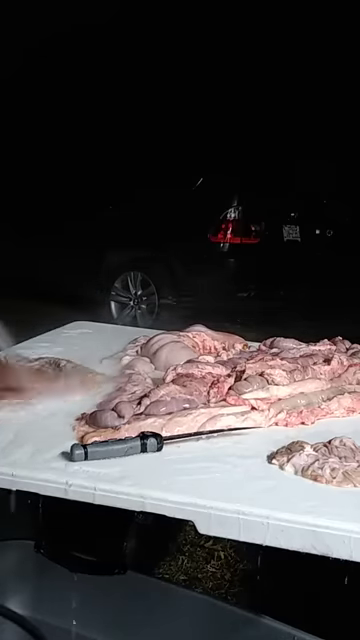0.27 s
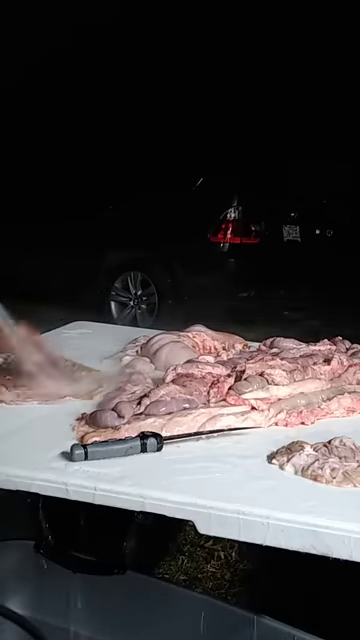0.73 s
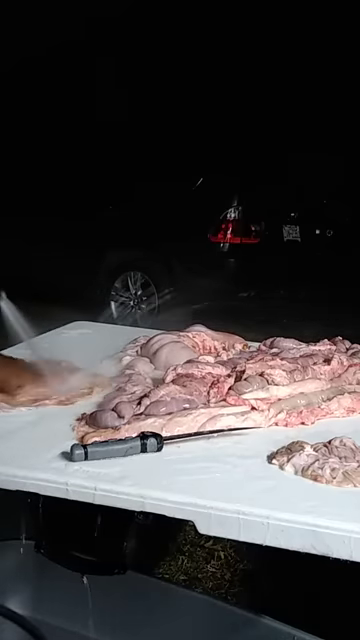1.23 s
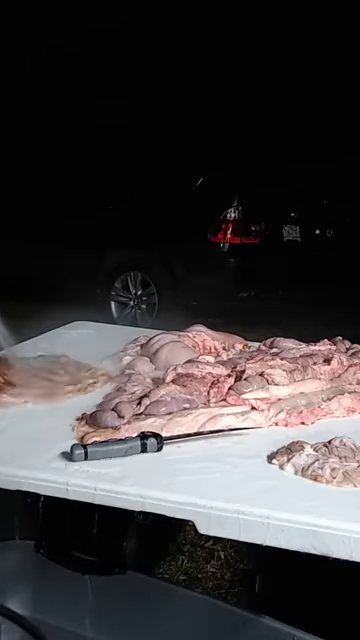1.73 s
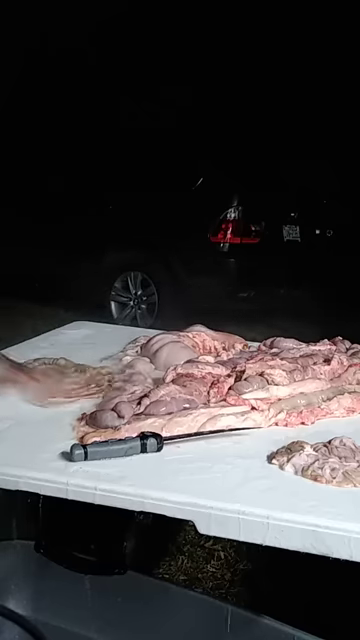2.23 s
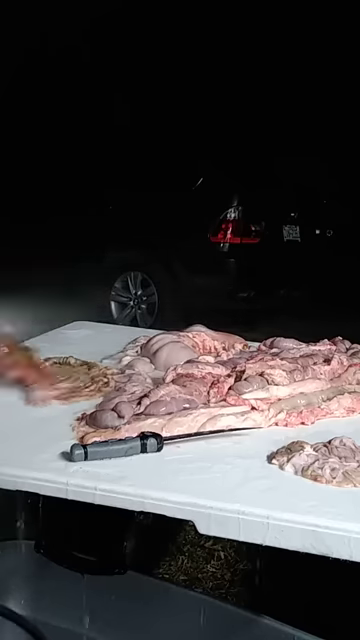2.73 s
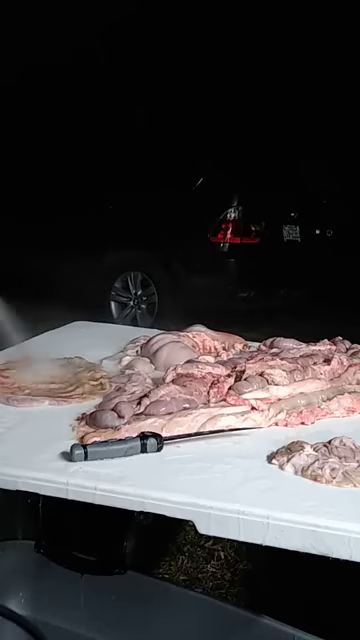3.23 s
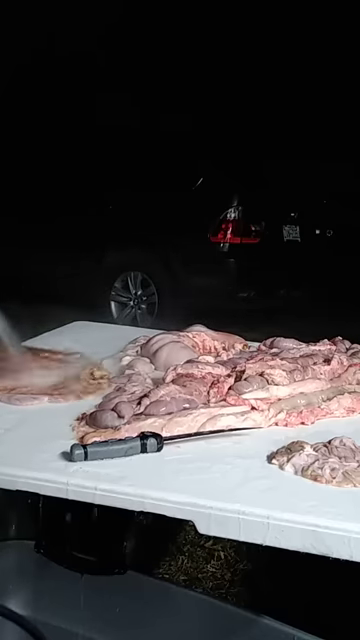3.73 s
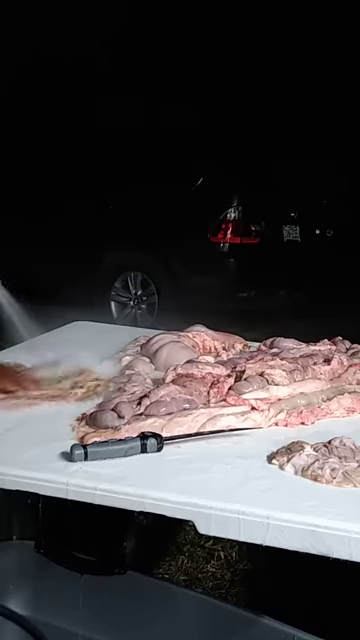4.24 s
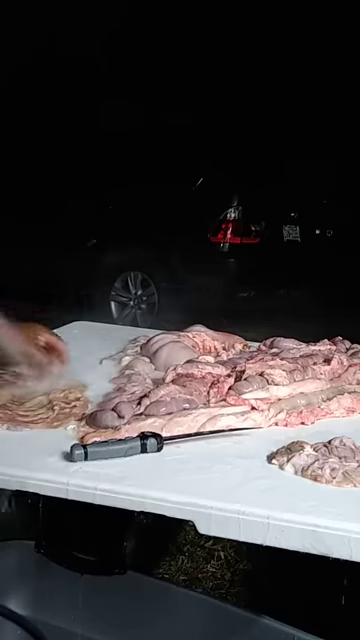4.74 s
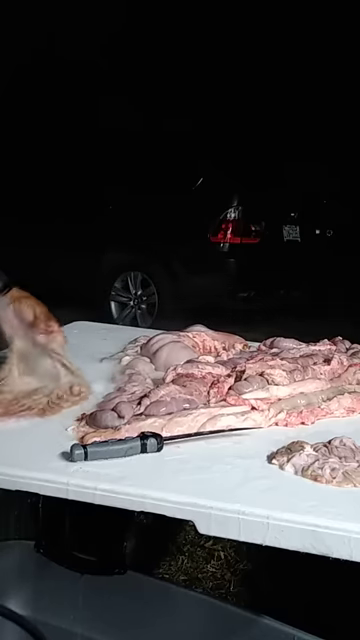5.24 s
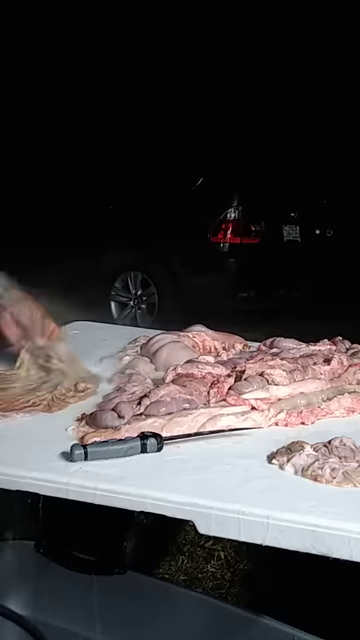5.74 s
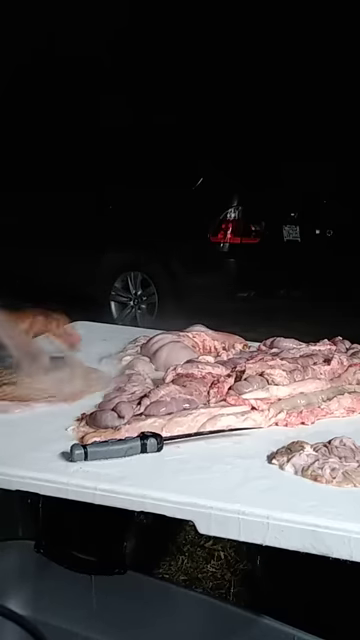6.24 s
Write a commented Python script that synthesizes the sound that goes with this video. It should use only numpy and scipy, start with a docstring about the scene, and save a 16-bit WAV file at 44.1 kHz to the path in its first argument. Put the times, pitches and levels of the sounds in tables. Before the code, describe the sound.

Close mono sound outdoors, dry, with no deep bass and a steeply cut top. A hose nozzle sprays raw meat on a plastic folding table from start to end, about 6.5 seconds. Dense drops, bubbles and fine hiss form a bright, coarse splash that swells and ebbs several times a second as a hand turns the meat. Hard jet contact adds a narrow, ringing rasp at about 0.2 s, briefly at 1.4 s, strongest from 2.4 to 2.9 s, and again at 5.1 s. Around 1.05 s a soft, heavy flop booms through the table; another, shorter thud comes near 2.87 s, followed by a tiny dip in the spray. Wet splats and squelches, some low near 1.3 s, others higher, are scattered throughout, clustering around 4.1 and 5.3 s. Beneath lie a faint hollow table drone and a weak, wavering low hum. The spray continues at the end.

```python
"""A hose nozzle sprays raw meat on a plastic folding table, outdoors at night, heard in mono.
From the start, random drop impacts, bubbles and hiss patter and splash as a hand turns the meat.
A hard jet excites narrow bands: it rasps at 0.2 and 1.4 s, for half a second from 2.4 s, and at 5.1 s.
Near 1.0 and 2.9 s the meat flops and excites the damped modes of the table, which booms.
Throughout, bursts of filtered noise make splats, the table drones and a faint low hum wavers."""
import sys
import numpy as np
from scipy import signal
from scipy.fft import rfft, irfft
from scipy.io import wavfile

SR = 44100
rng = np.random.default_rng(int(sys.argv[2]) if len(sys.argv) > 2 else 0)


def file_out(sig):
    """Save sig as 16-bit WAV at sys.argv[1]."""
    # one column per channel
    cols = np.atleast_2d(sig).T
    # limit, then scale
    lim = np.clip(cols, -1, 1)
    pcm = np.round(lim * 32767).astype(np.int16)
    wavfile.write(sys.argv[1], SR, pcm)


N = 285190
TIME = np.arange(N) / SR
FREQS = np.maximum(np.arange(N // 2 + 1) * SR / N, 1)

# borders between the five bands of the spray: edge_hz
ZONE_EDGES_HZ = [470, 900, 2400, 4400]
# relative spectral density of the spray: frequency_hz, density_db
SPRAY_COLOUR = [(190, -15), (350, -9.5), (600, -5), (950, -2.5), (2000, 1), (3200, -5.5), (5000, -5),
                (6200, -3.5), (6900, -10), (7600, -7), (8000, -19.5), (8300, -24.5)]
# resonances in series that colour every drop: frequency_hz, width_hz, gain_db
RESONANCES = [(268, 34, 9.3), (427, 59, 10.1), (560, 61, 8.9), (650, 63, 8.6), (739, 51, 8.3),
              (880, 22, 3.5), (1163, 50, 11.0), (1242, 75, 5.6), (1378, 34, 7.2), (1783, 40, 7),
              (1832, 52, 6.2), (1973, 18, 4.0), (2059, 61, 6.7), (2238, 45, 2.1), (2483, 37, 4.3),
              (2579, 69, 7.0), (2821, 83, 12.7), (3370, 90, 11), (3465, 60, 8.5), (3619, 36, 4.8),
              (3724, 61, 9.4), (4174, 109, 7.5), (4415, 55, 4.0), (4607, 50, 5.1), (4851, 93, 5.1),
              (5368, 158, 4.9), (6494, 82, 7.3), (6734, 43, 4.0), (7249, 168, 8.1), (7738, 95, 4.8)]
# the spray between passes, from large drops to fine: zone, level_db, flutter_db
ZONES = [("hollow patter", -58.5, 0.77), ("patter on the tabletop", -49.5, 0.99),
         ("splash on wet meat", -43, 0.63), ("spatter", -42, .8), ("fine mist", -43.5, 0.94)]
# the hand brings meat and stream together: start_s, length_s, patter_rise_db, splash_rise_db, mist_rise_db
PASSES = [(0.0, 0.028, 4, 9.5, 2), (0.113, 0.2, 5.5, 5.5, 5), (0.322, 0.19, 3.5, 4.5, 4),
          (.53, .08, 0.5, 0.5, 1), (0.61, 0.12, 5.5, 6.5, 4.5), (0.748, 0.28, 5.5, 5, 3),
          (1.042, 0.037, 13.5, 11, 5.5), (1.125, 0.12, 4.5, 3, 1.5), (1.292, .14, 8, 7.5, 6),
          (1.487, 0.082, 3.5, 4.5, 5.5), (1.558, 0.24, 10, 4.5, 3.5), (1.916, 0.096, 7, 10, 2.5),
          (2.043, 0.14, 7.5, 5, 4), (2.393, 0.36, 8.5, 7.5, 6), (2.761, 0.19, 7.3, 7.5, 1),
          (2.96, 0.34, 8.5, 3, 5), (3.32, 0.12, 4, 1, 3.5), (3.446, .19, 8, 8, 4),
          (3.652, 0.11, 6.5, 1.5, 2), (3.77, 0.26, 7, 7.5, 3.8), (4.042, 0.15, 8, 4.5, 2.5),
          (4.33, 0.18, 8, 6.5, 1.5), (4.527, 0.17, 7, 10.5, 1.5), (4.702, 0.37, 10, 5.5, 3),
          (5.058, 0.091, 10, 10.5, 7), (5.161, 0.28, 10, 8, 3.5), (5.43, 0.17, 5, 7.5, 3.5),
          (5.61, 0.25, 6, 7, 3), (5.984, 0.18, 4, 5, 4.5), (6.172, 0.31, 7, 3.5, 2.5)]
PASS_ATTACK_S, PASS_RELEASE_S = 0.045, 0.048
# spatter rises by these shares of the rises in dB
SPATTER_FOLLOWS_SPLASH, SPATTER_FOLLOWS_MIST = 0.49, 0.31
# rise of the hollow patter as the spray finds other parts of the tabletop: time_s, rise_db
HOLLOWNESS = [(0, 3.5), (.8, 6.5), (1.3, -1), (2.2, 0), (2.8, -6), (3.9, -3), (5.1, -0.5), (5.9, -3),
              (6.47, -0.5)]
# the whole spray dips briefly after the hardest strike
DIP_S, DIP_LENGTH_S, DIP_DB = 2.949, 0.02, -5

# the jet strikes hard: start_s, length_s, level_db
JET_STRIKES = [(0.242, .29, -40.5), (1.385, 0.048, -37), (2.41, .525, -31), (5.085, 0.068, -35)]
# what rings where the jet strikes, relative levels: frequency_hz, width_hz, level_db
JET_MODES = [(747, 25, 2.5), (1176, 20, 3), (2580, 80, -3), (3520, 270, -1), (3720, 36, 0), (4036, 61, 1.5),
             (4160, 91, -14)]
# it holds, weakens as it slides off its spot, and is gone
JET_ATTACK_S, JET_HOLD_S, JET_FADE_DB_PER_S, JET_RELEASE_S = 0.061, 0.19, 30, 0.03

# the most distinct splats and squelches: time_s, level_db, centre_hz, width_hz
SPLATS = [(.13, -34, 3600, 600), (.198, -33, 1690, 250), (.523, -33.5, 3640, 500), (.844, -34, 3320, 600),
          (1.06, -30.5, 1750, 704), (1.32, -31, 610, 130), (1.94, -33, 2900, 1500),
          (1.985, -35.5, 4800, 2000), (2.233, -34.5, 3900, 900), (2.811, -31, 1800, 895),
          (2.918, -33.5, 2300, 2200), (4.003, -35.5, 3100, 2500), (4.088, -33.5, 1840, 300),
          (4.165, -33.5, 4200, 2500), (4.558, -32, 1760, 700), (4.68, -35, 665, 200),
          (5.24, -46.5, 280, 80), (5.28, -33.5, 1280, 350), (5.339, -34.5, 3870, 500),
          (5.38, -35, 2030, 300), (5.545, -32, 2020, 500), (5.825, -36, 2700, 1200),
          (6.364, -33, 1810, 250)]
# length at 1 kHz, and the power of pitch by which higher gouts are briefer
SPLAT_LENGTH_S, SPLAT_SHORTENS = 0.023, 0.19
# faint, high spits at random moments
SPITS_PER_S, SPIT_DB, SPIT_SPREAD_DB = 2.0, -43, 1
SPIT_LOW_HZ, SPIT_HIGH_HZ, SPIT_WIDTH_HZ = 4200, 7040, 900

# meat flopping on the table: time_s, level_db, contact_s
FLOPS = [(1.046, -34, 0.0082), (1.073, -42, 0.012), (2.859, -48, .004), (2.868, -36.5, 0.0018),
         (2.887, -40, .004)]
# low damped modes of the table, relative levels: frequency_hz, level_db, t60_s
TABLE_MODES = [(62, -13.5, .3), (95, 1, 0.13), (118, -1, 0.092), (148, -2, 0.26), (214, -7.5, 0.16),
               (256, -2.5, 0.19)]
# relative spectral density of the table's drone: frequency_hz, density_db
DRONE_COLOUR = [(25, -40.5), (40, -22.5), (58, -8), (95, -5), (117, -0.5), (135, -9), (153, -3),
                (182, -29.5), (230, -9), (275, -5.5), (400, -20), (900, -59.5)]
# how hard the water drums on the bare tabletop between passes: time_s, level_db
DRUMMING = [(0, -60), (.8, -58), (2.3, -56), (3.2, -53), (3.6, -59.5), (4.5, -59.5), (5.3, -57.5),
            (5.85, -60), (6.47, -60)]
DRONE_FOLLOWS = 0.21   # share of the patter's rise in dB

CUTOFF_HZ = 8300


def spray(surge_db):
    """Drop size sets pitch: large drops sound low, mist high; all surge as the stream breaks up."""
    water = rfft(wet_noise(tick_db=-2.5, bubble_db=-6.5, hiss_db=-2.0, plip_db=-17.0))
    # each zone is the difference of two neighbouring low-passes
    below = [0] + [1 / (1 + (FREQS / hz) ** 12) for hz in ZONE_EDGES_HZ] + [1]
    dip_db = DIP_DB * np.exp(-0.5 * (2 * (TIME - DIP_S) / DIP_LENGTH_S) ** 2)
    shared_db = surge_db * drift(25) + dip_db
    patter_db, splash_db, mist_db = passes()
    hollow_db = patter_db + np.interp(TIME, *np.transpose(HOLLOWNESS))
    spatter_db = SPATTER_FOLLOWS_SPLASH * splash_db + SPATTER_FOLLOWS_MIST * mist_db
    rises_db = [hollow_db, patter_db, splash_db, spatter_db, mist_db]
    out = np.zeros(N)
    for k, (_, level_db, flutter_db) in enumerate(ZONES):
        band = irfft(water * (below[k + 1] - below[k]), N)
        fluttering = band * from_db(shared_db + flutter_db * drift(25))
        out += from_db(level_db + rises_db[k]) * rms_one(fluttering)
    return out


def passes():
    """Weighted superposition: patter, splash and mist rises in dB add, or average where passes meet."""
    contact = np.array([gate(start, length, PASS_ATTACK_S, PASS_RELEASE_S)
                        for start, length, *_ in PASSES])
    rises_db = np.array(PASSES)[:, 2:]
    return rises_db.T @ contact / np.maximum(contact.sum(axis=0), 1)


def wet_noise(tick_db, bubble_db, hiss_db, plip_db):
    """Source and filter: impacts, bubbles and fine-droplet hiss excite resonances in series."""
    ticks = rms_one(impacts(per_s=7000, spread_db=2.5))
    fizz = bubbles(per_s=3000, spread_db=3.0, cycles=18.0, low_hz=401.6, high_hz=7570)
    lone = rms_one(plips(per_s=110, low_hz=1398, high_hz=7180, rise=0.016, cycles=8.1, spread_db=17.0))
    hiss = rng.standard_normal(N)
    water = from_db(tick_db) * ticks + from_db(bubble_db) * fizz
    water = water + from_db(plip_db) * lone + from_db(hiss_db) * hiss
    for hz, width, db in RESONANCES:
        water = water + (from_db(db) - 1) * resonate(water, hz, width)
    return coloured(water, SPRAY_COLOUR)


def impacts(per_s, spread_db):
    """Shot noise: clicks at random moments, many small drops and a few large ones."""
    sizes = from_db(spread_db * np.minimum(rng.exponential(1, N), 4.0))
    signs = rng.choice([-1, 1], N)
    landed = rng.random(N) < per_s / SR
    return sizes * signs * landed


def bubbles(per_s, spread_db, cycles, low_hz, high_hz, count=36):
    """Bubble resonance: air pockets in the water film ring for a few cycles, over a range of pitches."""
    pitches = np.geomspace(low_hz, high_hz, count)
    born = impacts(per_s, spread_db)
    dealt = rng.choice(count, N, p=np.sqrt(pitches) / np.sqrt(pitches).sum())
    out = np.zeros(N)
    for k, hz in enumerate(pitches):
        ringing = resonate(born * (dealt == k), hz, 2 * hz / cycles)
        out += np.sqrt(hz) * rms_one(ringing)
    return rms_one(out)


def plips(per_s, low_hz, high_hz, rise, cycles, spread_db):
    """Rising bubble pitch: lone larger bubbles burst through the film and climb as they die."""
    out = np.zeros(N)
    age = np.arange(SR // 20) / SR
    for when, size, pitch in rng.random((round(per_s * N / SR), 3)):
        hz = low_hz * (high_hz / low_hz) ** pitch
        start = int(when * (N - len(age)))
        life = age * hz / cycles   # 1 at the peak of the swell
        swell = life * np.exp(1 - life)
        tone = np.sin(2 * np.pi * hz * age * (1 + rise * life))
        out[start:start + len(age)] += from_db(-spread_db * size) * swell * tone
    return out


def jet():
    """Forced resonance: a dense rattle of drops hammers one spot, which rings in a few narrow bands."""
    force = np.zeros(N)
    for start, length, db in JET_STRIKES:
        fade_db = JET_FADE_DB_PER_S * np.maximum(TIME - start - JET_HOLD_S, 0)
        force += from_db(db - fade_db) * gate(start, length, JET_ATTACK_S, JET_RELEASE_S)
    drops = impacts(per_s=13000, spread_db=0.5)
    rasp = sum(from_db(db) * resonate(resonate(drops, hz, width), hz, 4 * width)
               for hz, width, db in JET_MODES)
    return force * rms_one(rasp)


def splats():
    """Band-limited noise burst: a gout of water lands, its drops ringing in a fold of the meat."""
    out = np.zeros(N)
    for s, db, hz, width in list(SPLATS) + spits():
        near = np.flatnonzero(np.abs(TIME - s) < 0.06)
        length = SPLAT_LENGTH_S * (1000 / hz) ** SPLAT_SHORTENS
        swell = np.exp(-0.5 * (2 * (TIME[near] - s) / length) ** 2)
        noise = rng.standard_normal(len(near))
        drops = resonate(resonate(noise, hz, width), hz, 2 * width) * swell
        # equal energy: the burst carries as much as its swell
        out[near] += from_db(db) * drops * np.sqrt(np.sum(swell ** 2) / np.sum(drops ** 2))
    return out


def spits():
    """Random arrivals: small stray gouts, as rows like those of the splats."""
    rows = []
    for when, size, pitch in rng.random((round(SPITS_PER_S * N / SR), 3)):
        level_db = SPIT_DB + SPIT_SPREAD_DB * (2 * size - 1)
        hz = SPIT_LOW_HZ * (SPIT_HIGH_HZ / SPIT_LOW_HZ) ** pitch
        rows.append((when * N / SR, level_db, hz, SPIT_WIDTH_HZ))
    return rows


def table():
    """Modal vibration: the hollow top drones under the spray and booms at each soft blow."""
    blows = np.zeros(N)
    for s, db, contact in FLOPS:
        push = np.exp(-0.5 * ((TIME - s) / contact * 2 * np.pi) ** 2)   # longer contact, duller thud
        blows += from_db(db) * push / push.sum()
    drumming_db = np.interp(TIME, *np.transpose(DRUMMING)) + DRONE_FOLLOWS * passes()[0]
    out = from_db(drumming_db) * rms_one(coloured(rng.standard_normal(N), DRONE_COLOUR))
    for k, (hz, db, t60) in enumerate(TABLE_MODES):
        decay = from_db(-60 / (t60 * SR))   # per sample
        turn = 2 * np.pi * hz / SR
        poles = [1, -2 * decay * np.cos(turn), decay * decay]
        # the air follows the speed of the mode
        boom = signal.lfilter([1, 0, -1], poles, blows + 1e-18) / 2
        # neighbouring modes swing in opposite directions
        out = out + (-1) ** k * from_db(db) * boom
    return signal.sosfilt(signal.butter(2, 700, fs=SR, output="sos"), out)


def hum(hz, width_hz, level_db):
    """Narrow-band noise: a faint low hum wavers behind the water."""
    band = 1 / (1 + ((FREQS - hz) / width_hz) ** 2)
    return from_db(level_db) * rms_one(irfft(rfft(rng.standard_normal(N)) * band, N))


def gate(start, length, attack, release):
    """Linear envelope: rise from 0 to 1, hold, fall; each ramp is centred on its edge."""
    rising = (TIME - start) / attack
    falling = (start + length - TIME) / release
    return np.clip(np.minimum(rising, falling) + 0.5, 0, 1)


def drift(rate_hz):
    """Low-passed noise: slow chance with a spread of 1."""
    return rms_one(irfft(rfft(rng.standard_normal(N)) / (1 + (FREQS / rate_hz) ** 2), N))


def coloured(x, spectrum):
    """Spectral shaping: weight x by a density in dB, interpolated over log frequency."""
    hz, db = np.transpose(spectrum)
    gain = from_db(np.interp(np.log(FREQS), np.log(hz), db))
    return irfft(rfft(x) * gain, N)


def resonate(x, hz, width):
    """Simple resonator: a single peak with a gain of 1 on top."""
    return signal.lfilter(*signal.iirpeak(hz, hz / width, fs=SR), x + 1e-18)


def rms_one(x):
    """Power normalisation: scale to a mean square of 1."""
    return x / np.sqrt(np.mean(x ** 2) + 1e-20)


def from_db(db):
    """Logarithmic level: decibels to amplitude gain."""
    return 10 ** (np.asarray(db) / 20)


def scene():
    """Superposition: all the water, the table and the hum reach one microphone."""
    mono = spray(surge_db=0.67) + jet() + splats() + table() + hum(hz=120.4, width_hz=4.9, level_db=-61.5)
    return np.stack([mono, mono])


def record(dry):
    """Band limiting: the microphone loses the deep bass; the top is cut steeply."""
    thinned = signal.sosfilt(signal.butter(4, 42, "high", fs=SR, output="sos"), dry)
    return signal.sosfilt(signal.ellip(12, 0.1, 90, CUTOFF_HZ, fs=SR, output="sos"), thinned)


dry = scene()
out = record(dry)
file_out(out)
```